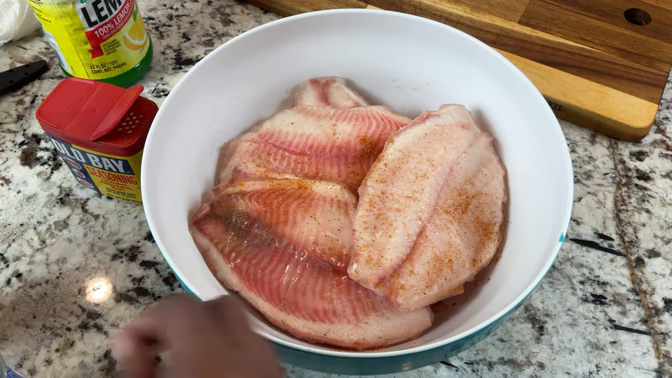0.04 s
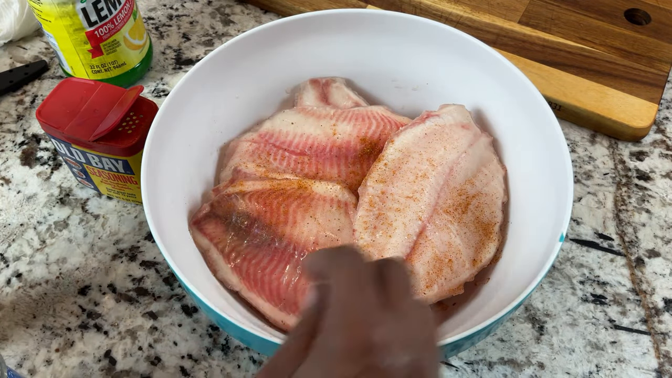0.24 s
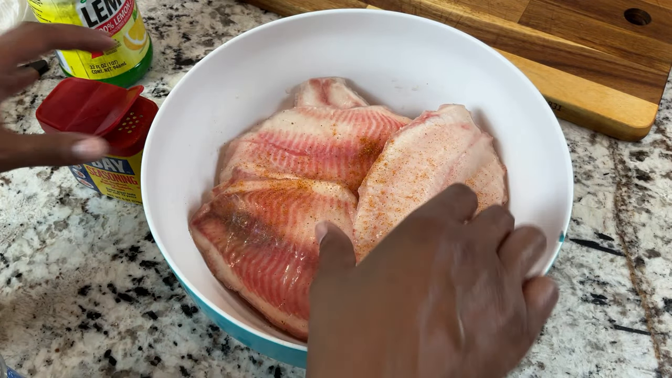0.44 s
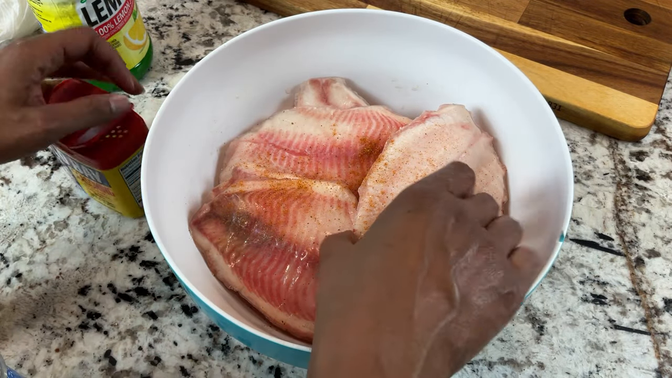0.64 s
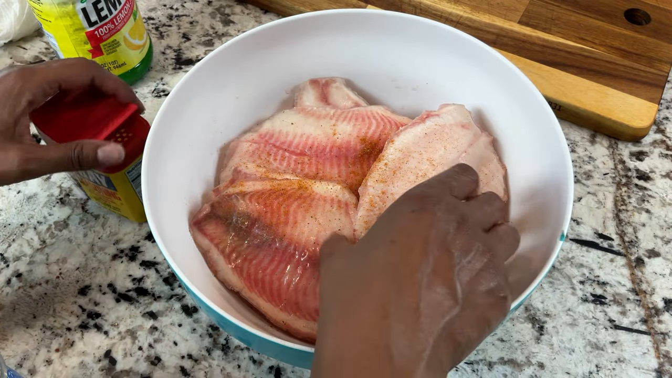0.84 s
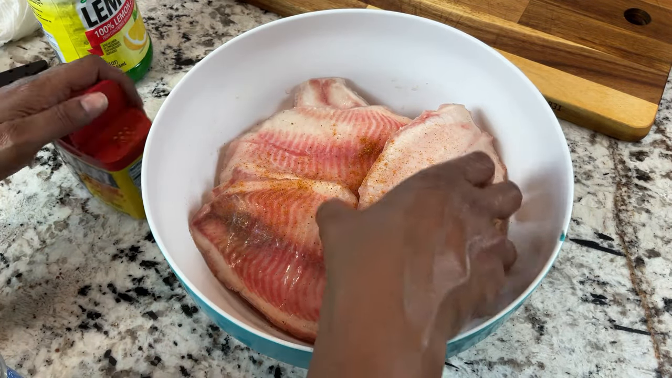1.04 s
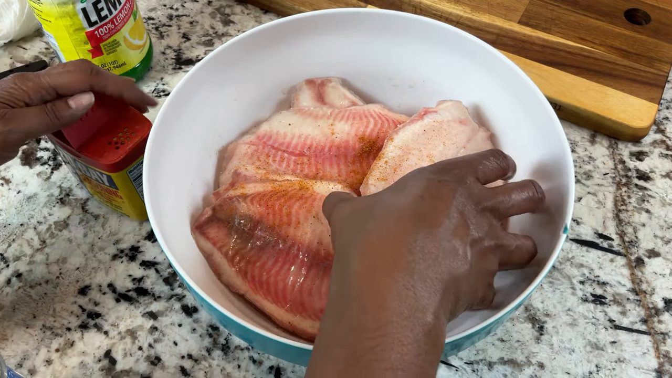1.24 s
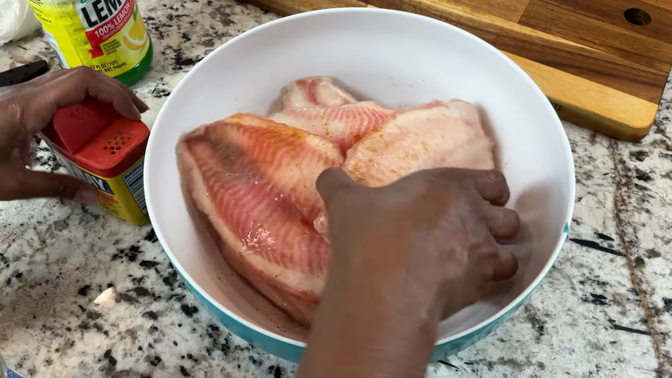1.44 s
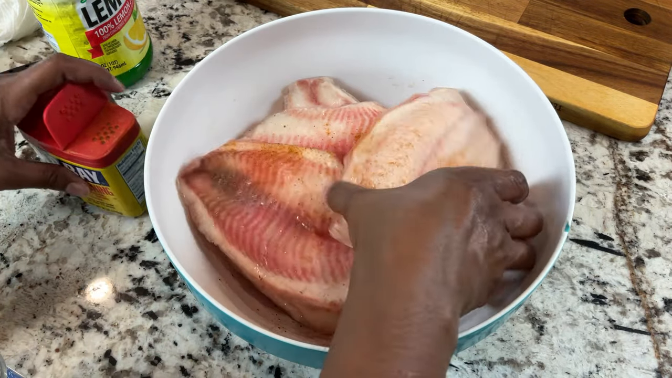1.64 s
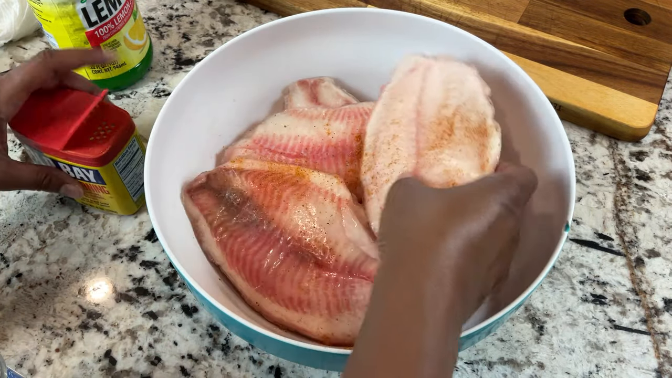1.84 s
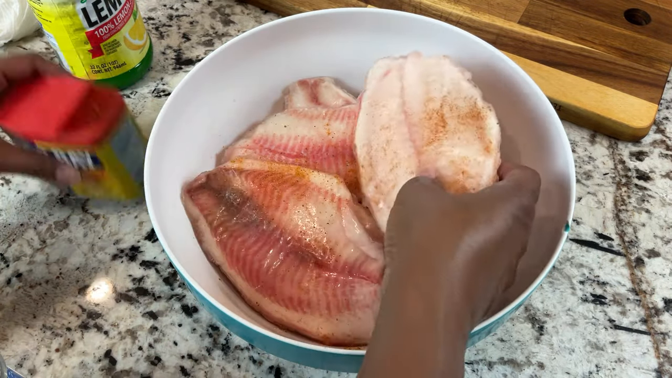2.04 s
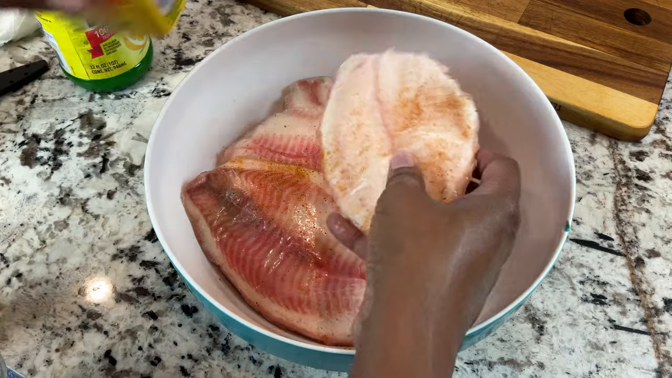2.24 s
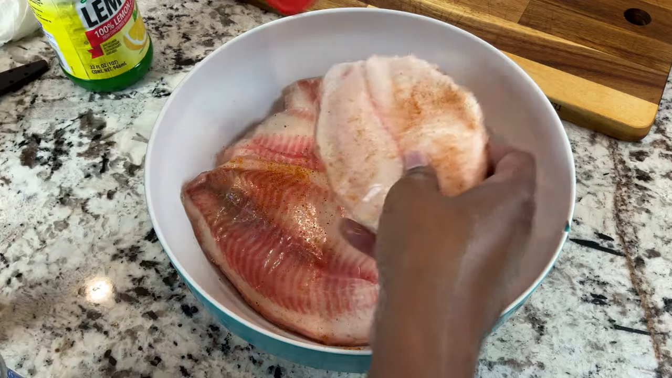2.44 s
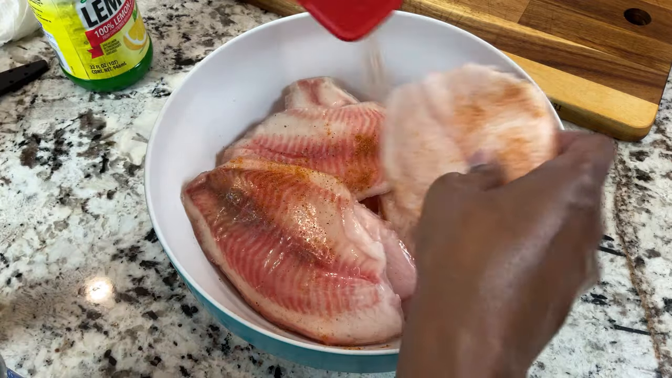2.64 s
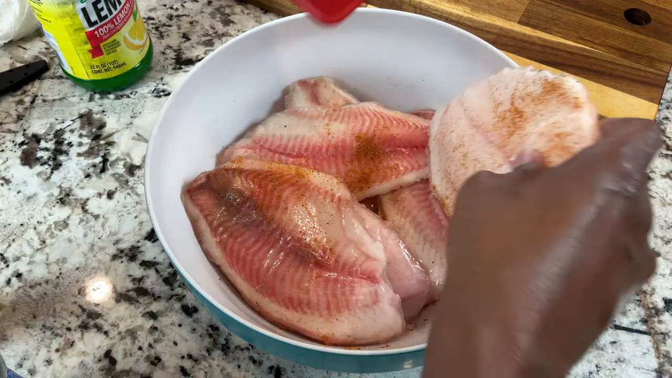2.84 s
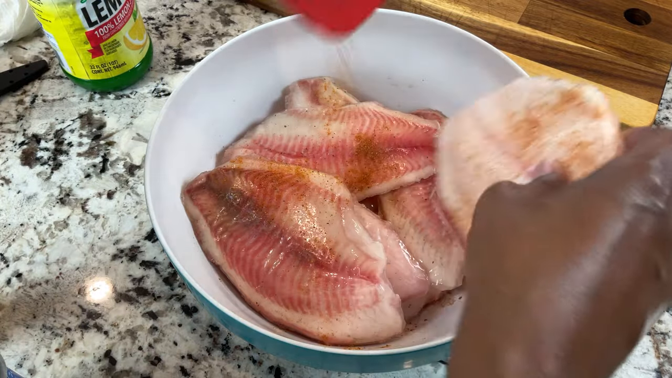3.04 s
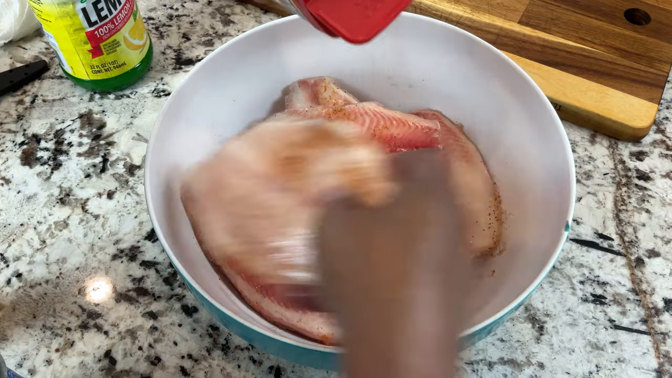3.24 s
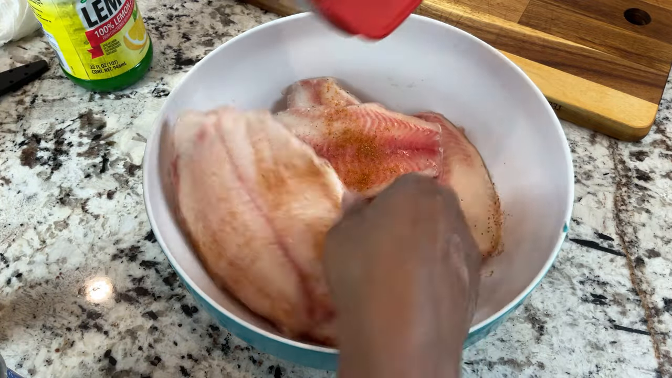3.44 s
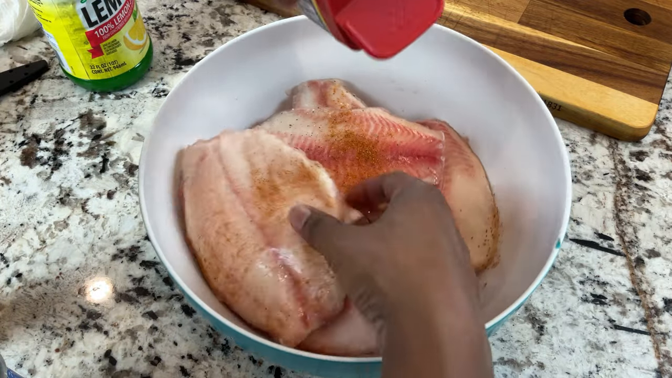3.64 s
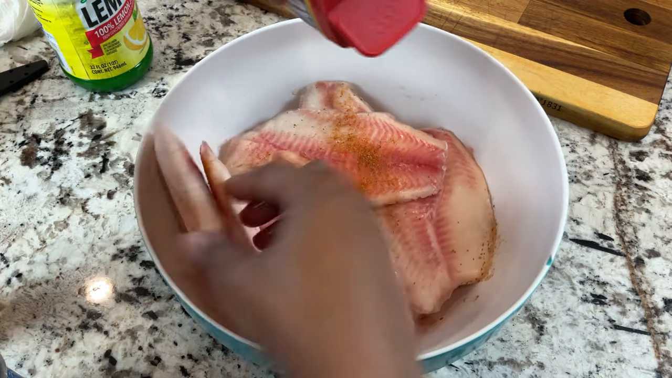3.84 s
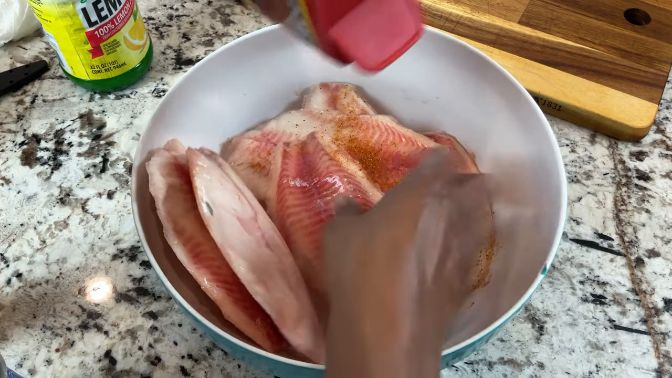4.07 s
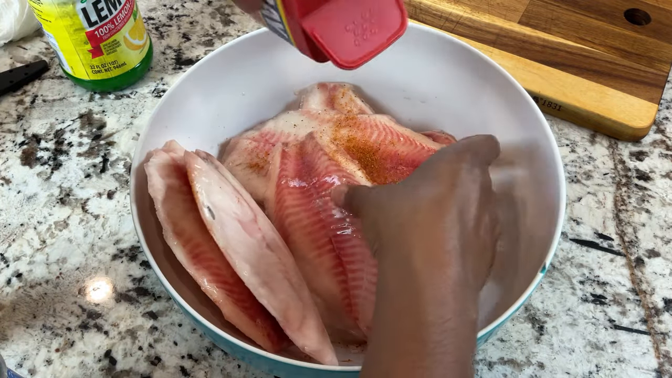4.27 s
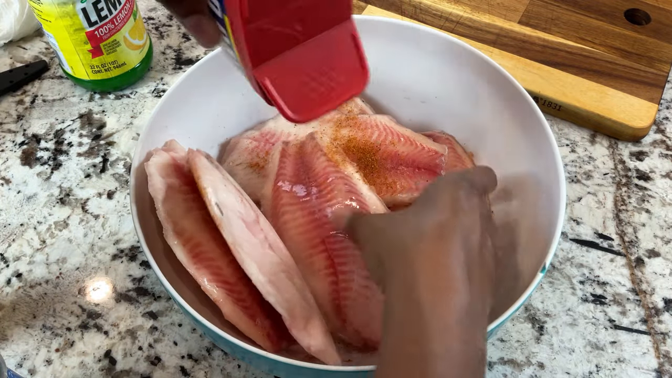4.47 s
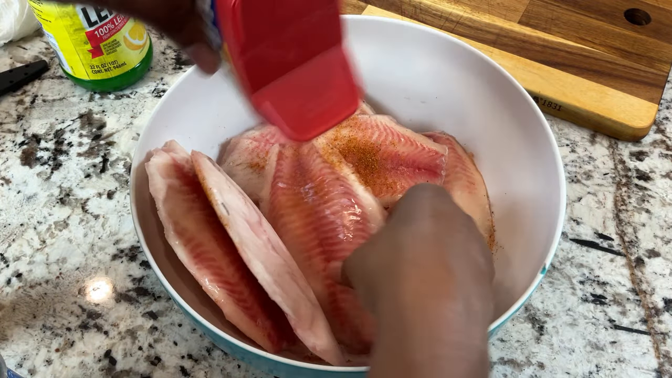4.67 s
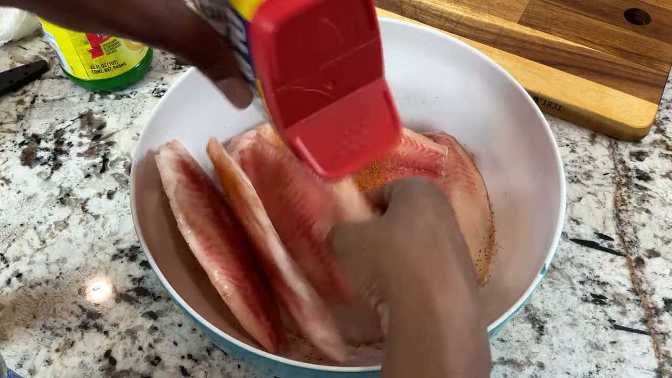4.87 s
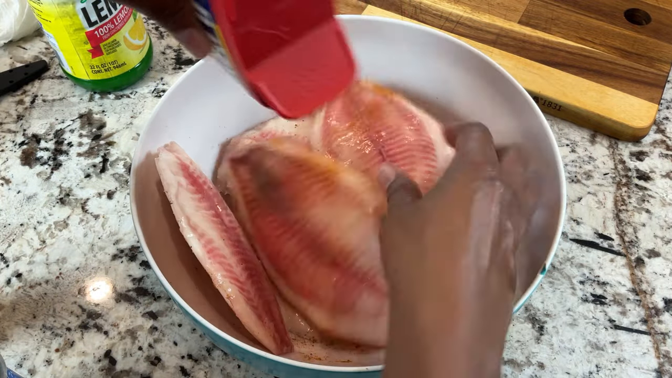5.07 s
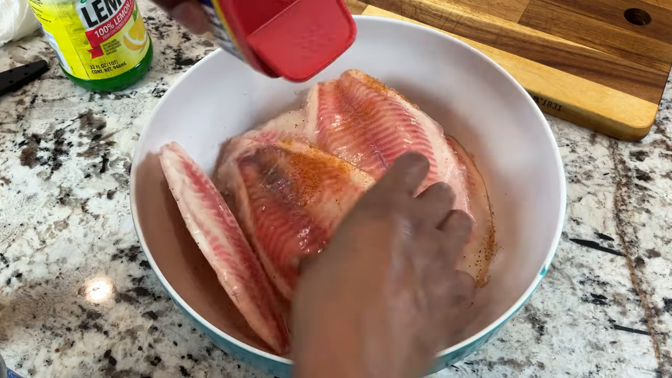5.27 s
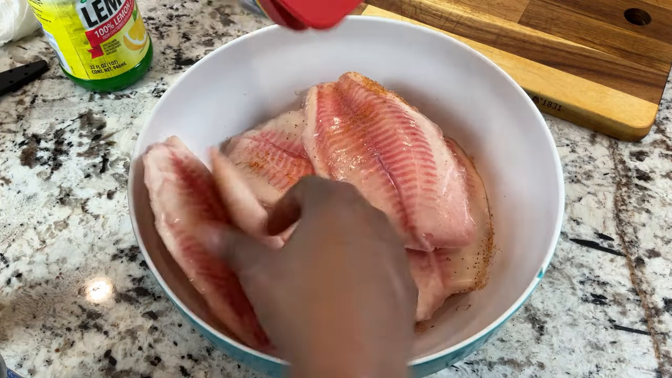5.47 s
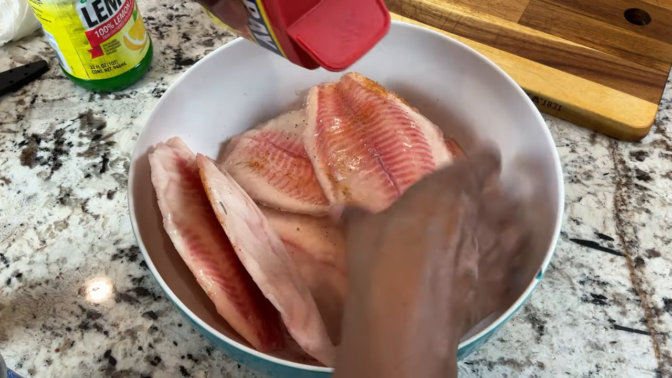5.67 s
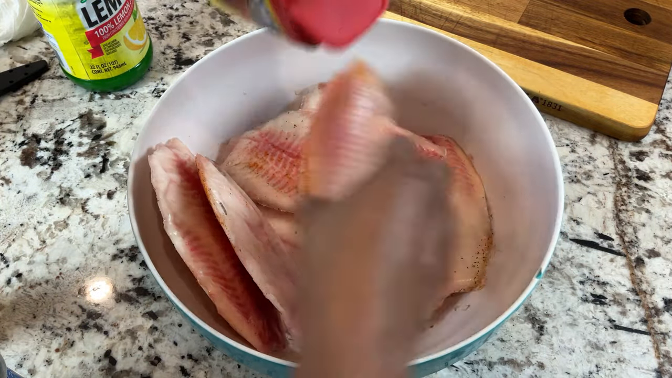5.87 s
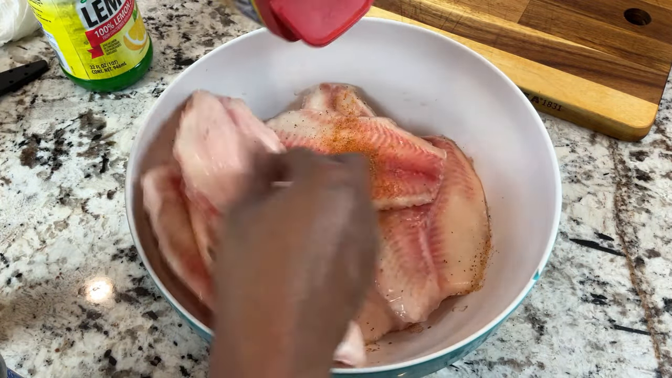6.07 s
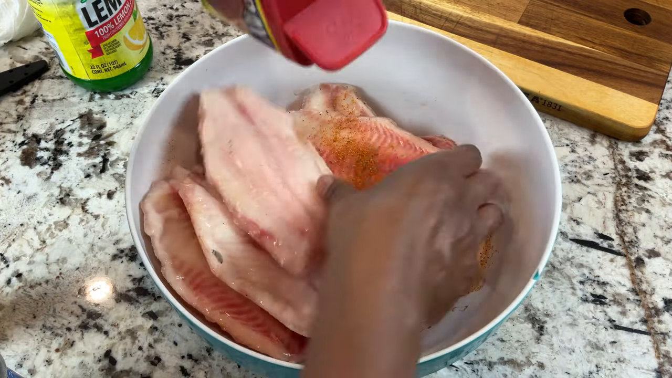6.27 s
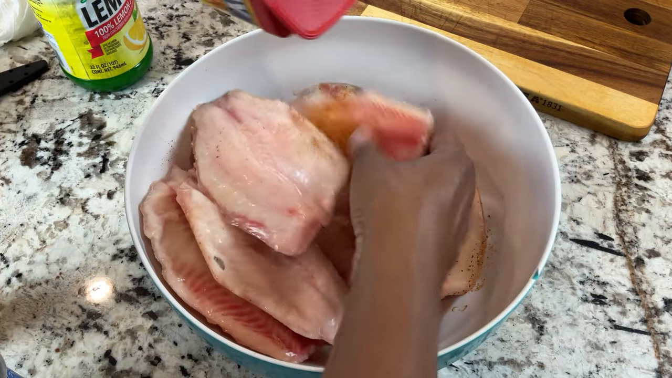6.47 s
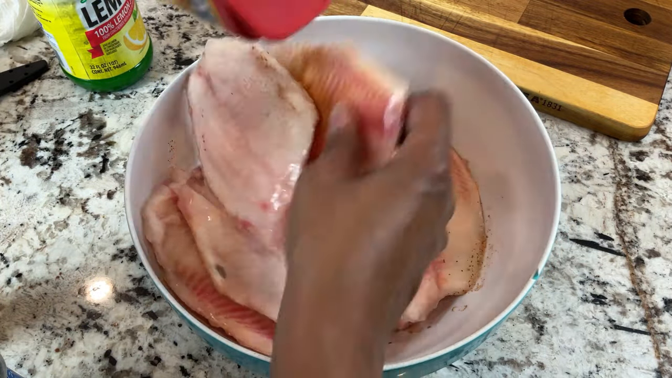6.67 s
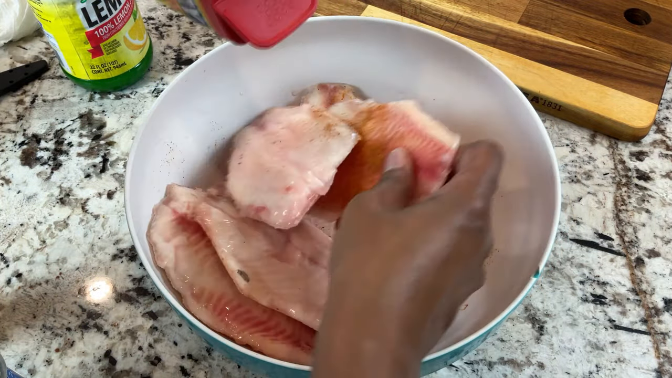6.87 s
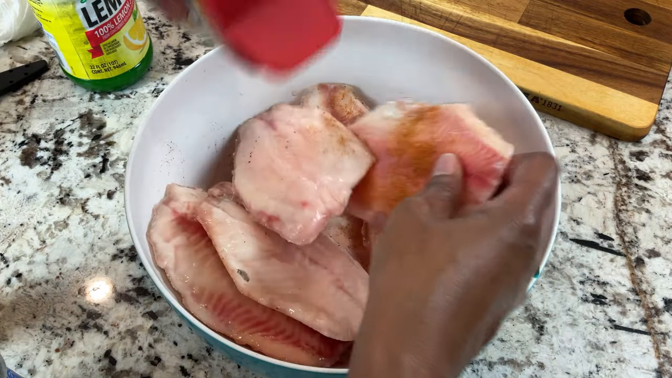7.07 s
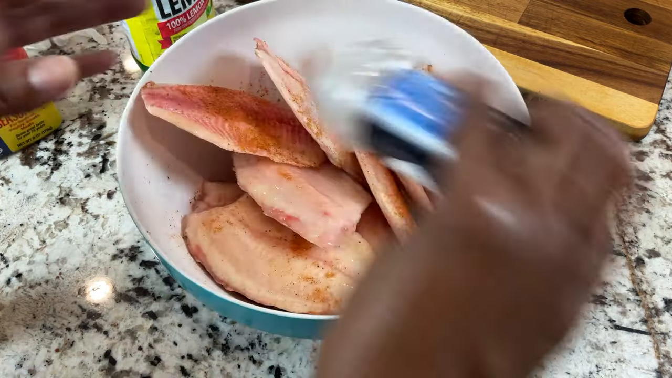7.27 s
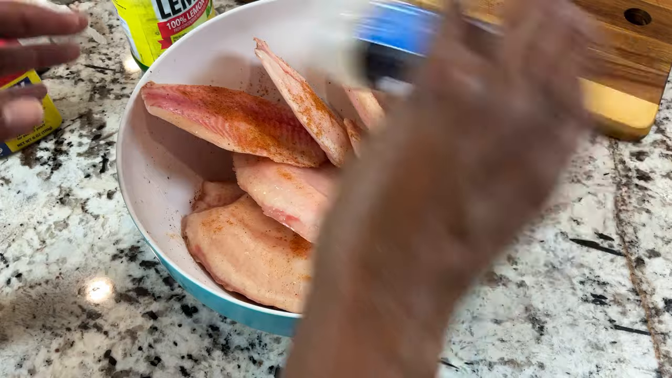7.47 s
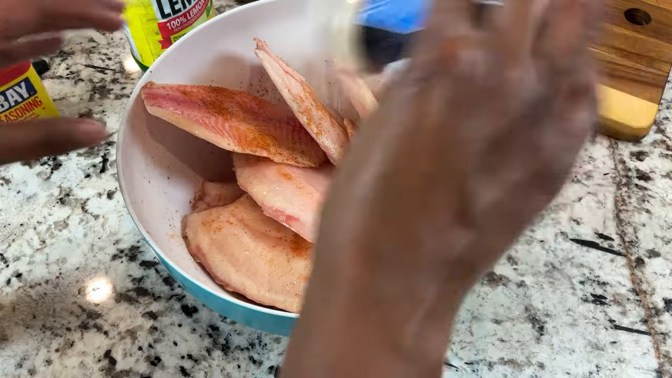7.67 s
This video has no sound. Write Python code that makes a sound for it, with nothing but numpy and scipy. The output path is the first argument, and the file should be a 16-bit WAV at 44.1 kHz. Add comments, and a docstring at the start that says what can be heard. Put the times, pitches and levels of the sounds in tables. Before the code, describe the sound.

Icy fish fillets are turned by hand in a bowl, with sharp clunks, crunchy frost, gritty scrapes and a few dull tin taps.

```python
"""Hard frozen fish fillets are tossed by hand in a large bowl on a stone counter in a live kitchen.
Each blow is a crunchy burst of force that drives damped modes of bowl and fillet and cracks the frost.
Slides rasp and hiss as streams of tiny slips; a seasoning tin is tapped beside them in the same way.
Echoes and a diffuse tail add the room, over a steady coloured noise bed.
The close microphone overloads on the hardest knocks, and the sound cuts out briefly near the end."""
import sys
import numpy as np
from scipy import signal
from scipy.fft import rfft, irfft, next_fast_len
from scipy.io import wavfile

SR = 44100
rng = np.random.default_rng(int(sys.argv[2]) if len(sys.argv) > 2 else 0)


def put_to_file(sound):
    """Save the sound as 16-bit audio at rate SR, in the file named by the first command-line argument."""
    columns = np.atleast_2d(sound).T  # one column per channel
    safe = np.clip(columns, -1, 1)
    whole_steps = np.round(safe * 32767)
    wavfile.write(sys.argv[1], SR, whole_steps.astype(np.int16))


N = 340011
TIME = np.arange(N) / SR
KNOCK_SIZE = 6000  # samples that one blow lasts


def from_db(db):
    """Turn decibels into an amplitude factor."""
    return 10 ** (np.asarray(db) / 20)


def rms_one(x):
    """Scale a steady sound to an rms of one."""
    return x / np.sqrt(np.mean(x ** 2) + 1e-20)


def energy_one(x):
    """Scale a short sound to a total energy of one."""
    return x / np.sqrt(np.sum(x ** 2) + 1e-20)


def at_hz(points, hz):
    """Read a curve on a log-frequency axis."""
    points = np.array(points)
    return np.interp(np.log(np.maximum(hz, 1)), np.log(points[:, 0]), points[:, 1])


def colour(x, spectrum):
    """Causal (minimum-phase) filter with the given spectrum."""
    size = 2 * next_fast_len(len(x))
    hz = np.arange(size // 2 + 1) * SR / size
    cepstrum = irfft(np.log(from_db(at_hz(spectrum, hz))))
    # folding the cepstrum forward in time makes the filter minimum-phase
    cepstrum[1:size // 2] *= 2
    cepstrum[size // 2 + 1:] = 0
    response = np.exp(rfft(cepstrum))
    return irfft(rfft(x, size) * response)[:len(x)]


# Steady kitchen background. Each row: frequency in Hz, relative level in dB per Hz.
AMBIENCE = [(25, -21.5), (60, -7), (78, 5.5), (90, 2), (115, 1.5), (205, -4), (325, 1), (420, -6.5),
            (700, -11.5), (1500, -15.5), (3600, -22), (6300, -23.5), (9000, -27.5), (16000, -30.5)]


def kitchen_background():
    """Steady noise, heaviest in the bass, under everything else."""
    return from_db(-51) * rms_one(colour(rng.standard_normal(N), AMBIENCE))


def contact(length, crunch=0.84, touch=0.64, grain_db=4.5, bump_s=.0006, rise=0.11):
    """Force of one blow: a first touch, then icy bumps crush and let go."""
    t = TIME[:KNOCK_SIZE]
    age = t / max(length, 1e-4)
    bump = (t / max(bump_s, 1e-4)).astype(int)
    sizes = from_db(grain_db * np.clip(rng.standard_normal(KNOCK_SIZE), -2, 2))
    bumps = rng.standard_normal(KNOCK_SIZE) * sizes[bump]
    envelope = age ** abs(rise) * np.exp(-(age / 1.93) ** 1.82)
    force = crunch * energy_one(bumps * envelope)
    force[0] += touch * np.exp(-length / 0.0018)  # long contacts start softly
    return force


def ring(force, hz, t60):
    """One damped resonance, driven by the force; t60 is the time to fall 60 dB."""
    r = 1000 ** (-1 / (max(t60, 1e-3) * SR))
    feedback = [1, -2 * r * np.cos(2 * np.pi * hz / SR), r * r]
    return signal.lfilter([1, 0, -1], feedback, force + 1e-18)


def body(force, modes, pitch=1, spread_db=2.0, detune=0):
    """Modes share the energy of a blow, a little differently at each point of contact."""
    chance = rng.standard_normal((len(modes), 2))
    total = np.zeros(len(force))
    for k, ((hz, db, t60), (level_chance, pitch_chance)) in enumerate(zip(modes, chance)):
        mode = energy_one(ring(force, hz * pitch * np.exp(detune * pitch_chance), t60))
        total += (-1) ** k * from_db(db + spread_db * level_chance) * mode  # signs alternate
    return energy_one(total)


def strike(rows, blow):
    """Place one blow per row at its time; each part's dB is its rms over 20 ms."""
    out = np.zeros(N + KNOCK_SIZE)
    for s, *columns in rows:
        start = int(s * SR)
        out[start:start + KNOCK_SIZE] += blow(*columns)
    return np.sqrt(.02 * SR) * out[:N]


# The clear blows. Each row: start in seconds, thud of the bowl on the counter in dB, bowl base in dB,
# fillet clack in dB, rim in dB, clack pitch in Hz, contact length in seconds.
KNOCKS = [(.106, -61, -61, -53.5, -44, 940, 0.011), (.142, -53, -47.5, -38, -27.5, 1460, 0.0029),
          (1.292, -41.5, -30, -39, -45.5, 1190, 0.0021), (1.311, -36.5, -39, -36.5, -49, 1030, 0.017),
          (1.337, -59, -60, -37.5, -34, 2050, .0055), (1.442, -57, -64, -42.5, -46, 2070, .0048),
          (1.603, -36, -28.5, -8.5, -25, 1554, .0012), (1.679, -34, -4, -19, -3.5, 1150, 0.0017),
          (1.694, -32, -14.5, -26, -15, 950, .007), (1.786, -57, -26.5, -28, -41, 1110, .0037),
          (1.875, -42, -24.5, -43, -43, 1130, 0.003), (1.915, -52, -31.5, -39, -45, 1150, 0.0032),
          (2.515, -50, -81, -45, -61, 1186, 0.0034), (2.895, -52.5, -60, -50.5, -56.5, 1746, .0054),
          (3.192, -29.5, -1, -20, -34, 939, 0.0019), (3.21, -27, -9, -12.5, -19.5, 863, 0.0046),
          (3.236, -22, -33, -30, -37.5, 950, 0.003), (3.325, -55.5, -30.5, -28.5, -21.5, 1020, 0.0027),
          (3.343, -14, -17.5, -33, -14.5, 1830, 0.0037), (3.357, -44, -33, -11.5, -13, 1164, 0.0026),
          (3.459, -33, -18.5, -27, -23, 960, 0.00089), (3.494, -27, -26.5, -49, -35, 1293, 0.0052),
          (3.519, -54, -54, -30.5, -44, 1730, 0.00037), (3.57, -41.5, -21, -31, -29.5, 1370, 0.0029),
          (3.592, -44.5, -51, -31, -40, 1420, .0017), (3.611, -33, -23, -32.5, -30, 1160, 0.0013),
          (3.648, -42, -30, -44, -30.5, 1580, 0.003), (3.728, -44, -29, -61, -37, 1100, 0.0033),
          (3.78, -38.5, -28.5, -37, -15.5, 1686, 0.0017), (3.835, -29, -21, -33, -21, 1450, 0.0027),
          (3.87, -33, -17, -25.5, -29, 1600, 0.0024), (3.887, -31.5, -25, -27, -41, 1780, 0.0019),
          (3.932, -17.5, -15, -8, -25, 1400, 0.0026), (3.948, -31, -35, -21, -39, 1350, .0008),
          (3.982, -28.5, -27, -29, -48, 980, 0.0011), (4.066, -44, -38, -28.5, -45, 1060, 0.0032),
          (4.129, -62, -42, -32, -36.5, 1434, 0.0011), (4.269, -44, -45, -36.5, -56, 908, 0.00073),
          (4.387, -42, -43, -32.5, -48, 927, 0.0012), (4.399, -38, -36, -36, -45, 1110, 0.0017),
          (4.473, -54, -48, -49, -47, 1310, 0.0059), (4.576, -35, -27.5, -23, -46.5, 1141, 0.0044),
          (4.608, -44, -37, -23.5, -67, 1472, 0.00049), (4.692, -49, -37, -37.5, -50, 1515, .003),
          (4.8, -56.5, -36, -26.5, -34, 1300, 0.005), (4.82, -35.5, -27.5, -30.5, -31.5, 1448, 0.0074),
          (4.835, -37.5, -52, -41, -53, 1140, 0.0025), (4.904, -35, -30.5, -21.5, -38, 1164, 0.0055),
          (4.961, -28, -29.5, -27.5, -54, 1410, 0.00099), (5.007, -25.5, -23, -16.5, -33, 1065, .0033),
          (5.033, -38, -37, -29, -34, 1420, 0.0022), (5.042, -38, -17.5, -17.5, -28, 1400, 0.0023),
          (5.059, -28, -23, -32, -35, 1196, 0.00038), (5.083, -43, -25, -35, -36, 1290, 0.00076),
          (5.099, -29.5, -29, -23, -49, 1340, 0.00098), (5.257, -47, -23, -20, -40, 1420, 0.0033),
          (5.348, -32, -21.5, -34, -24, 1150, 0.0022), (5.361, -56, -24, -56, -28, 1220, 0.0036),
          (5.374, -41, -21.5, -24, -48, 1527, 0.0016), (5.386, -20, -20, -26, -19, 1304, 0.0031),
          (5.416, -44.5, -23.5, -26, -39.5, 914, 0.0046), (5.439, -30, -13, -20.5, -23, 1331, 0.0034),
          (5.449, -29, -29, -30.5, -27.5, 910, 0.0036), (5.634, -47, -43, -31, -53, 940, 0.004),
          (5.694, -37, -41, -32, -59, 950, 0.0022), (5.738, -38.5, -32, -23.5, -38.5, 1350, 0.004),
          (5.872, -40, -15.5, -22.5, -21, 1200, 0.0017), (5.903, -34, -19, -20, -31, 1380, 0.0014),
          (5.917, -35.5, -5.5, -15.5, -15.5, 940, 0.0027), (5.93, -21, -13.5, -24, -15, 865, 0.0065),
          (5.95, -36, -18, -30.5, -18, 920, 0.0039), (6.092, -47.5, -34, -35.5, -40, 1360, 0.0014),
          (6.191, -44, -31.5, -27.5, -43, 880, 0.0021), (6.233, -40.5, -32, -35.5, -42, 1300, 0.00065),
          (6.268, -33, -31, -16.5, -38, 1880, 0.0027), (6.295, -34, -40, -16.5, -32, 1460, 0.0017),
          (6.301, -33, -27.5, -24, -12, 980, 0.002), (6.371, -43, -22.5, -59, -49.5, 1144, 0.0019),
          (6.463, -54, -56, -33, -37, 1350, 0.0069), (6.476, -53.5, -44, -28, -37, 1440, 0.0013),
          (6.521, -35.5, -35.5, -31.5, -48, 1250, 0.0072), (6.639, -32, -29.5, -35, -27.5, 1560, 0.0025),
          (6.676, -35, -31.5, -32, -38, 1710, 0.0024), (6.703, -37, -20.5, -13.5, -19.5, 1001, 0.0037),
          (6.711, -30.5, -34, -9.5, -29, 1495, 0.0014), (6.743, -32, -23.5, -43, -49, 1000, .0066),
          (6.761, -48, -29, -21.5, -34, 1360, 0.0015), (6.793, -35.5, -28, -44, -25.5, 1140, 0.0016),
          (6.983, -42, -46, -36.5, -36.5, 1500, .0051), (7.01, -45, -52, -35, -47, 1340, .0011),
          (7.042, -47, -63, -37, -38, 1590, 0.00086), (7.102, -49, -38.5, -38, -43, 1370, 0.0027),
          (7.122, -66, -43, -45.5, -42, 1348, 0.0021)]
# Bowl on the counter, then its base, both damped by the load.
# Each row: frequency in Hz, relative level in dB, t60 in seconds.
THUD_MODES = [(41.3, -15.5, 0.08), (66, -17, 0.086), (117, -4, 0.12), (165, -2.5, 0.014),
              (226.5, 1.5, 0.056), (340, 1.5, 0.03)]
BOWL_MODES = [(333.7, -14.5, 0.03), (424.5, -9, 0.024), (490, -5, 0.017), (555.6, -3, 0.046),
              (615.8, -0.5, 0.063), (655.8, -2.5, 0.028), (870, -11, 0.01)]
# Bowl rim. Each row: frequency in Hz, relative level in dB, t60 in seconds.
RIM_MODES = [(2277, -3, .012), (2456, 1, 0.038), (2623, -1, 0.036), (2710, -3.5, 0.0085),
             (2880, -1.5, 0.046), (3184, -4, 0.013), (3810, -10, .007), (4600, -10, 0.0089)]
# A frozen fillet. Each row: ratio to the clack pitch, relative level in dB, t60 in seconds.
FILLET_MODES = [(.6, -2.5, 0.0083), (0.782, 1.5, 0.0053), (1.0, 1, 0.0086), (1.25, -1, 0.0087),
                (1.55, -8, 0.0028), (2.099, -14, 0.0054)]
# The bowl's wall, shaken by fillets that clack inside it.
# Each row: frequency in Hz, relative level in dB, t60 in seconds.
WALL_MODES = [(989, 2.5, 0.073), (1330, -12, 0.04), (1440, 1.5, 0.035), (1670, -8, 0.025),
              (2034, 5.5, 0.03)]
# Cracking frost. Each row: frequency in Hz, relative level in dB per Hz.
CRACK = [(2500, -22), (3800, 7.5), (5500, 3.5), (7500, -5), (10000, -14.5), (13000, -19.5), (16000, -24)]
# crack level at a rim level of 0 dB, dB gained per dB of rim, random swing either way in dB
CRACK_DB, CRACK_FOLLOWS, CRACK_SPREAD_DB = -13, 0.78, 8
CRACK_LIMIT_DB = -22.5  # there is only so much frost to crack


def knock(thud_db, bowl_db, clack_db, rim_db, pitch, length):
    """A blow rings the fillet, the bowl's base, wall and rim, and cracks the frost."""
    force = contact(length)
    crack_db = CRACK_DB + CRACK_FOLLOWS * rim_db + CRACK_SPREAD_DB * rng.uniform(-1, 1)
    crack_db = min(crack_db, CRACK_LIMIT_DB)
    fillet = body(force, FILLET_MODES, pitch, detune=0.039)
    wall = from_db(-9.0) * body(force, WALL_MODES)
    return (from_db(thud_db) * body(force, THUD_MODES)
            + from_db(bowl_db) * body(force, BOWL_MODES, detune=0.013)  # the load shifts between blows
            + from_db(clack_db) * energy_one(fillet + wall)
            + from_db(rim_db) * body(force, RIM_MODES)
            + from_db(crack_db) * energy_one(colour(force, CRACK)))


# Seasoning tin, gripped and tipped on the counter.
# Each row: start in seconds, level in dB, contact length in seconds.
TIN_TAPS = [(.466, -45, 0.019), (.484, -45.5, 0.009), (.591, -39.5, 0.003), (.641, -34.5, 0.0079),
            (.657, -49, 0.0074), (.775, -26.5, 0.0013), (.811, -39, 0.0045), (.851, -44, 0.0041),
            (1.035, -45.5, 0.0024), (1.14, -51.5, .0088), (1.203, -43.5, 0.0038)]
# The tin with its plastic lid. Each row: frequency in Hz, relative level in dB, t60 in seconds.
TIN_MODES = [(307.6, 0.5, 0.044), (392, -5.5, 0.0032), (680, -6.5, 0.052), (874, 1, 0.034),
             (980, -1, 0.014), (1400, -10.5, .01), (2140, -3, 0.008), (3150, -8, 0.0041),
             (5270, -18, 0.0022)]


def tin_tap(level_db, length):
    """The small tin gives a dull, hollow tap from its own damped modes."""
    return from_db(level_db) * body(contact(length), TIN_MODES)


# Each push of the hand slides the fillets. Each row: start in seconds, length in seconds,
# scrape in dB, frost hiss in dB; the rubbing mix later sits 3 dB under these levels.
SLIDES = [(0.539, 0.081, -43.5, -53), (0.845, 0.033, -44.5, -55.5), (0.952, 0.077, -50.5, -59),
          (1.247, 0.098, -29.5, -44), (1.418, 0.11, -38, -48.5), (1.689, .18, -42.5, -46.5),
          (1.961, 0.18, -54, -58), (2.462, 0.049, -57, -47.5), (2.764, 0.11, -60, -52.5),
          (3.221, 0.24, -29.5, -44), (3.47, .44, -32.5, -42.5), (4.07, .1, -45, -51.5),
          (4.203, 0.37, -47.5, -51), (4.611, 0.26, -38.5, -41.5), (4.921, 0.14, -29.5, -40.5),
          (5.171, 0.24, -38.5, -47.5), (5.328, 0.056, -23, -32.5), (5.672, 0.084, -38, -44),
          (5.959, .14, -34.5, -46), (6.236, 0.044, -35, -41), (6.408, .12, -39, -38.5),
          (6.617, 0.11, -29.5, -34), (6.865, .22, -39.5, -40), (7.34, 0.21, -79.5, -54.5),
          (7.6, 0.081, -73, -56.5)]
SLIDE_ATTACK_S, SLIDE_RELEASE_DB_PER_S = .03, 188.5


def sliding():
    """Gains of scrape and frost hiss: every slide picks up speed, holds, then dies away."""
    scrape, frost = np.zeros((2, N))
    for start, length, scrape_db, frost_db in SLIDES:
        attack = np.clip((TIME - start) / SLIDE_ATTACK_S, 0, 1)
        release = from_db(-SLIDE_RELEASE_DB_PER_S * np.clip(TIME - start - length, 0, 1))
        speed = attack * release
        scrape = np.maximum(scrape, speed * from_db(scrape_db))
        frost = np.maximum(frost, speed * from_db(frost_db))
    return scrape, frost


def flutter(rate):
    """Random values, rate of them a second, joined by straight lines; they make rasp and hiss flutter."""
    knots = rng.standard_normal(4000)
    return np.interp(TIME * rate, np.arange(len(knots)), knots)


def grains(per_s, size_db, clump_db, clump_rate, smooth):
    """Tiny slips of uneven size over a smooth hiss, both fluttering in level."""
    sizes = from_db(size_db * np.minimum(rng.exponential(1, N), 2)) * rng.choice([-1, 1], N)
    slips = rms_one(sizes * (rng.random(N) < per_s / SR))
    hiss = smooth * rng.standard_normal(N)
    return (slips + hiss) * from_db(clump_db * np.clip(flutter(clump_rate), -2, 1))


# Rasp of the fillets, then hiss of the frost. Each row: frequency in Hz, relative level in dB per Hz.
SCRAPE = [(90, -13.5), (250, -1), (400, -2.5), (600, 3.5), (850, -1), (1500, 1.5), (2500, 2.5),
          (3500, -6.5), (5500, -40)]
FROST = [(2200, -8), (4000, -2), (6300, 1), (9000, -8.5), (12000, -12.5), (16000, -20.5)]


def rubbing(bowl_db=-19.5):
    """Sliding fillets rasp, which keeps the bowl faintly ringing; frost and seasoning hiss on top."""
    scrape_gain, frost_gain = sliding()
    slips = grains(per_s=600, size_db=5.5, clump_db=3.0, clump_rate=110, smooth=.45)
    bowl = from_db(bowl_db) * rms_one(body(slips, BOWL_MODES))
    rasp = rms_one(colour(slips, SCRAPE)) + bowl
    crystals = grains(per_s=1800, size_db=5.0, clump_db=5.0, clump_rate=75, smooth=.6)
    frost = colour(crystals, FROST)
    return scrape_gain * rms_one(rasp) + frost_gain * rms_one(frost)


# clack level against the slide's scrape column, and how far chance moves it
JOSTLES_PER_S, JOSTLE_DB, JOSTLE_SPREAD_DB = 13, -2.5, 5
# thud, bowl and rim against the clack
JOSTLE_THUD_DB, JOSTLE_BOWL_DB, JOSTLE_RIM_DB = -11, -6, -8.5
# centre of the clack pitch, and contact length
JOSTLE_HZ, JOSTLE_CONTACT_S = 1370, 0.0036


def jostles():
    """Small knocks at uneven moments of the longer slides, stronger where the scrape is louder."""
    rows = []
    for start, length, scrape_db, _ in SLIDES:
        count = int(length * JOSTLES_PER_S)  # the shortest slides have none
        for k, (when, size, pitch) in enumerate(rng.uniform(-1.2, 1, (count, 3))):
            s = min(start + length * (k + .5 + .5 * when) / count, TIME[-1])
            db = scrape_db + JOSTLE_DB + JOSTLE_SPREAD_DB * size
            hz = JOSTLE_HZ * 2 ** (.5 * pitch)  # about half an octave either way
            rows.append((s, db + JOSTLE_THUD_DB, db + JOSTLE_BOWL_DB, db, db + JOSTLE_RIM_DB,
                         hz, JOSTLE_CONTACT_S))
    return rows


# Kitchen decay. Each row: frequency in Hz, t60 in seconds.
ROOM_T60 = [(100, 1), (300, 0.63), (600, 0.82), (2500, 0.79), (5000, 0.74), (9000, 0.95), (15000, 1)]
# Strength of the reverberation. Each row: frequency in Hz, level in dB.
ROOM_DB = [(100, -5.5), (300, -4.5), (600, -7), (1200, -11.5), (2600, -14.5), (5000, -7.5), (9000, -10),
           (15000, -27)]
# Counter, cabinets and wall. Each row: delay in seconds, level in dB.
ECHOES = [(.0032, -20), (0.0102, -16), (0.0198, -28.5)]


def kitchen(x, build_up=0.005):
    """A few hard echoes and a diffuse tail of half-octave noise bands, each with its own decay."""
    t = TIME[:SR]
    edges = 50 * 2 ** (np.arange(18) / 2)
    white = rng.standard_normal((2, SR))
    response = np.zeros(SR)
    for k, (low, high) in enumerate(zip(edges, edges[1:])):
        hz = np.sqrt(low * high)
        band_filter = signal.butter(2, [low, high], "band", fs=SR, output="sos")
        band = signal.sosfilt(band_filter, white[k % 2])  # neighbouring bands use different noise
        decay = np.exp(-np.log(1000) * t / at_hz(ROOM_T60, hz))
        swell = 1 - np.exp(-(t / build_up) ** 2)
        level = from_db(at_hz(ROOM_DB, hz)) * np.sqrt(2 * (high - low) / SR)
        response += level * energy_one(band * decay * swell)
    for delay, db in ECHOES:
        response[int(delay * SR)] += from_db(db)
    return signal.fftconvolve(x, response)[:N]


def scene():
    """Bowl and tin in their room, over the steady background of the kitchen."""
    blows = strike(KNOCKS, knock) + strike(TIN_TAPS, tin_tap)
    slides = from_db(-3.0) * rubbing() + strike(jostles(), knock)
    near = blows + slides
    return (near + kitchen(near) + kitchen_background())[None]


# The moment of silence: one row of start in seconds, end in seconds.
DROPOUT = (7.13, 7.207)


def record(dry, top=0.54):
    """The microphone overloads with flat tops; the sound cuts out for a moment; the treble is cut."""
    clipped = dry / (1 + (dry / top) ** 8) ** (1 / 8)
    live = (TIME < DROPOUT[0]) | (TIME > DROPOUT[1])
    treble_cut = signal.ellip(10, .1, 90, 16000, fs=SR, output="sos")  # steep low-pass at 16 kHz
    return signal.sosfilt(treble_cut, clipped * live)


dry = scene()
out = record(dry)
put_to_file(out)
```